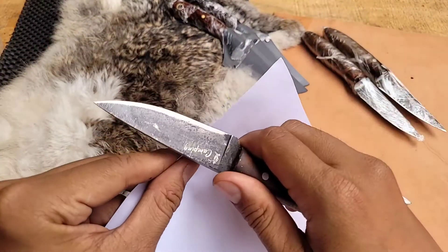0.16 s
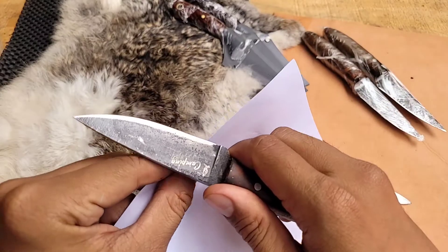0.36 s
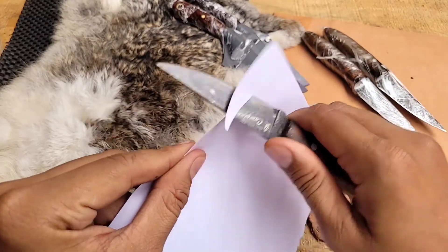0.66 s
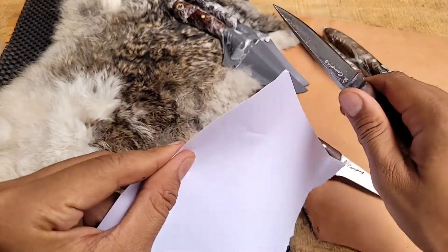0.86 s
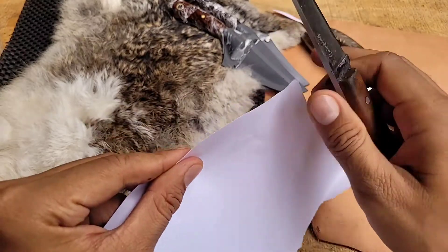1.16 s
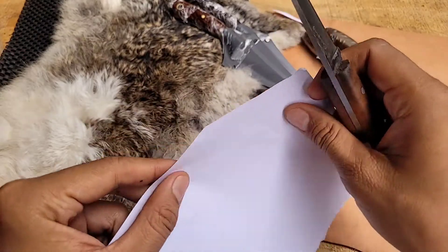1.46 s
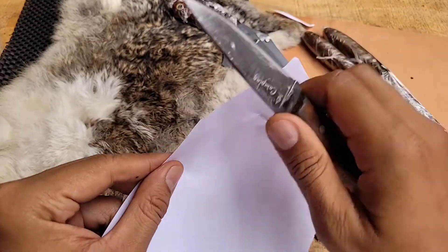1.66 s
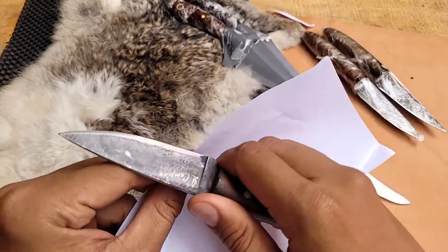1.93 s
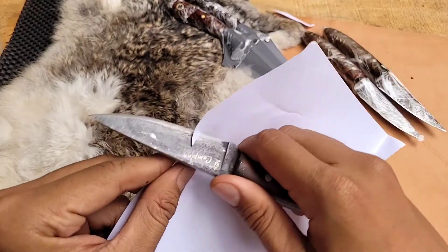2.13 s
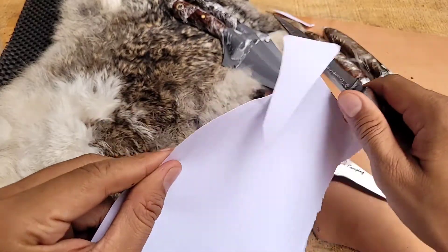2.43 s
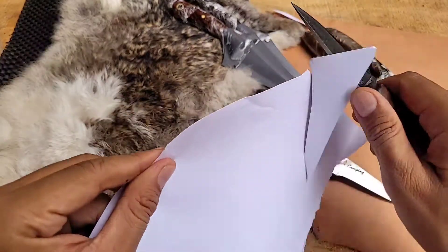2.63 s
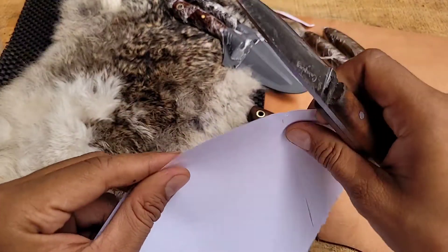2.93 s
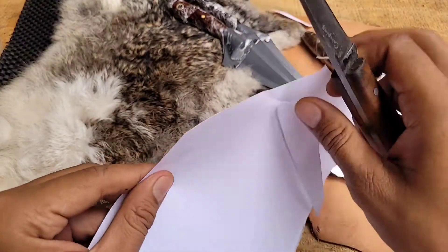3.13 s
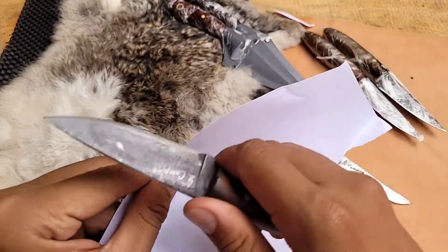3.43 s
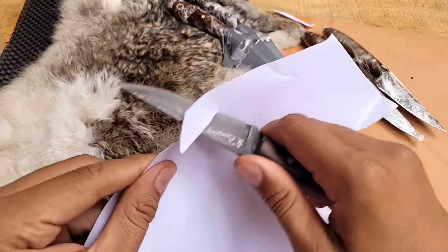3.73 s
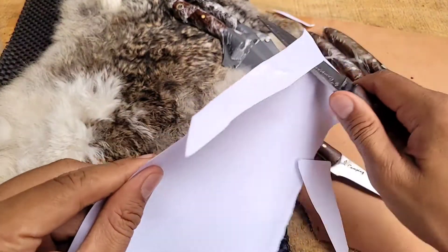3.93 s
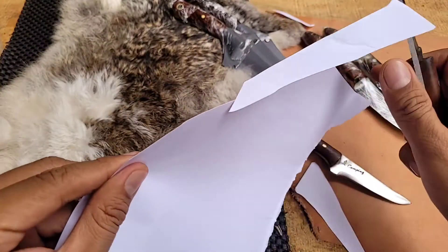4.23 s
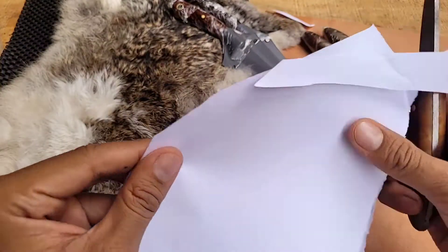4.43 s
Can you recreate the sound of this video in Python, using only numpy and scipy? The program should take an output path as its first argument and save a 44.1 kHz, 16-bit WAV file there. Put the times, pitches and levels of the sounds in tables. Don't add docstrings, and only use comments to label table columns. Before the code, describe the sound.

Three short, crisp knife cuts through paper close up, separated by soft finger rubs and crease snaps, over a faint far-off chugging engine.

```python
import sys
import numpy as np
from scipy import signal
from scipy.fft import rfft, irfft, next_fast_len
from scipy.io import wavfile
from scipy.ndimage import uniform_filter1d, map_coordinates

SR = 44100
rng = np.random.default_rng(int(sys.argv[2]) if len(sys.argv) > 2 else 0)


def nominal_scale(level):
    x = np.asarray(level, float) / 20
    return 10 ** x


def materialize(psi):
    bounded = np.clip(np.atleast_2d(psi).T, -1, 1)
    quanta = np.round(bounded * 32767).astype(np.int16)
    wavfile.write(sys.argv[1], SR, quanta)


N = 201960

# frequency in Hz, level in dB per Hz.
HUSH_COLOUR = [(410, -24), (700, 2.5), (1050, -10.5), (1220, -8), (1340, -16.5), (1470, -9), (2060, -12),
               (2640, -20), (2970, -17), (3420, -25.5), (5260, -20), (5840, -22.5), (15700, -52)]
# time in seconds, engine cycles per second.
IDLE_SPEED = [(0, 11.83), (1.2, 11.86), (2.8, 11.77), (3.5, 11.79), (4.58, 11.8)]
# multiple of the cycle rate, level in dB.
ENGINE_OVERTONES = [(1, -17), (2, -17), (3, -14), (4, 3.5), (5, -10), (6, 2), (7, -14.5), (8, -10.5),
                    (9, -3.5), (10, -9), (11, -2.5), (12, -11.5), (13, 2), (14, -22), (15, 2), (16, 1.5),
                    (17, -10.5), (18, 5), (19, -3), (20, -12.5), (21, -3.5), (22, -7.5), (23, -2.5),
                    (24, -14.5), (25, 4.5), (26, -4), (27, -3), (28, -0.5), (29, -11.5), (30, -9.5),
                    (31, -9), (32, -5.5), (33, -13.5), (34, -15.5), (35, -10.5), (36, -8)]
# frequency in Hz, level in dB per Hz.
EXHAUST_COLOUR = [(15, -37), (25, -11.5), (54, -7), (123, -7.5), (140, -4.5), (301, -2), (340, -3),
                  (355, -21), (533, -8), (677, -21.5), (708, -29.5), (900, -39), (1170, -44), (1980, -120)]
# frequency in Hz, likeness from 0 to 1.
FAR_ALIKE = [(60, 0.82), (130, 1), (290, .83), (640, 0.31), (1400, .02)]
# frequency in Hz, likeness from 0 to 1.
NEAR_ALIKE = [(300, 0.99), (1000, 0.83), (3000, 0.51), (8000, 0.5), (15000, 0.9)]
# frequency in Hz, phase in radians.
NEAR_DRIFT = [(400, .1), (1000, 0.46), (3000, 1.24), (8000, 2.14)]
# frequency in Hz, t60 in seconds.
YARD_T60 = [(200, 0.21), (2000, 0.38), (12000, 0.04)]
# frequency in Hz, left minus right in dB.
PORT_COLOUR = [(110, -0.5), (700, -0.3), (2400, 0.9), (5000, -1.8), (9000, 0.1), (15000, 2.5)]
# time in seconds, peak in dB, pitch in Hz, length in cycles.
AIR_PUFFS = [(0.167, -54, 1580, 4), (.208, -52, 1000, 2.5), (.226, -54, 1430, 4.6), (1.99, -51, 1150, 4),
             (.775, -32, 850, 3.4), (.794, -24.5, 910, 2.2), (.814, -21, 890, 1.2), (.821, -18, 790, 1.4),
             (.826, -15.5, 790, 0.69), (.837, -20, 793, 2.1), (.847, -24.5, 800, 2.2),
             (0.819, -43, 186, 2.9), (1.555, -30.5, 505, 1.9), (2.37, -43, 63.7, 3),
             (2.46, -32.5, 149, 1.6), (3.181, -31, 318, 1.5), (3.9, -51, 398, 3.2), (3.951, -42, 200, 2.5),
             (4.04, -41.5, 111, 0.83), (4.049, -35.5, 432, 5), (4.55, -30.5, 306, 2.35),
             (4.565, -31.5, 132, 0.94)]
# time in seconds, peak in dB, ring in Hz, bright crack in dB over the peak, t60 in seconds.
CREASE_SNAPS = [(1.384, -46.5, 937, -15, 0.025), (1.438, -48, 926, 0, 0.028),
                (1.457, -45.5, 1550, 3, 0.025), (1.55, -26, 925, -27, 0.016), (1.598, -39, 875, -22, 0.036),
                (2.471, -16, 891, -7.5, 0.0083), (2.517, -29, 686, -22, 0.035),
                (2.712, -37, 886, -19.5, 0.027), (2.731, -42, 870, -16, 0.023),
                (2.968, -46.5, 1510, -6.5, 0.018), (3.0, -28.5, 1100, -27, 0.016),
                (3.009, -35, 1380, -12, 0.015), (3.03, -31, 1350, -22, 0.017),
                (3.175, -28.5, 745, -26.5, 0.033), (3.186, -35, 1080, -20.5, 0.042),
                (3.197, -34.5, 840, -20, 0.015), (3.286, -46, 703, -13, 0.027),
                (4.047, -26, 940, -14, 0.04), (4.155, -51, 850, -16, 0.025), (4.426, -43, 775, -14, 0.029),
                (4.525, -34, 700, -20, 0.035), (4.553, -30, 850, -13, 0.054)]
# time in seconds, peak in dB, centre in Hz.
EDGE_TICKS = [(0.8729, -24.5, 4500), (0.9991, -49.5, 7400), (1.3114, -55, 4740), (1.3353, -53, 5240),
              (1.3603, -57, 4220), (2.0224, -52.5, 4300), (2.5084, -29, 12200), (2.6193, -52, 10700),
              (2.6477, -43, 5260), (2.673, -54, 4380), (2.7063, -45, 4290), (2.747, -49, 10900),
              (2.773, -50, 4630), (2.959, -37.5, 4230), (3.2455, -50.5, 4400), (3.3248, -51.5, 4110),
              (4.0686, -29, 5800), (4.0864, -34, 4870), (4.1147, -51, 4900), (4.3326, -60, 4540),
              (4.3535, -46, 7410)]
# lower edge in Hz, upper edge in Hz.
PAPER_BANDS = [(560, 1300), (1300, 4000), (4000, 8000), (8000, 17000)]
# frequency in Hz, level in dB per Hz.
SHEET_COLOUR = [(260, -13), (450, -2.5), (615, 1), (879, -0.5), (1720, -5), (2150, -9.5), (2460, -5),
                (3160, -6.5), (4730, -7), (7620, -11.5), (8840, -14), (12100, -10), (15800, -13.5)]
# time in seconds, force as sheet buzz in dB, bite as edge
# brightness in dB.
CUTS = [
    [(0.585, -75, -14), (0.63, -48, 0), (0.655, -41, -1), (0.728, -36, 5), (0.79, -33, 3), (0.822, -32, 3),
     (0.848, -35.5, 0), (0.9, -56, 2), (1.04, -84, -2)],
    [(2.13, -76, -14), (2.18, -42, 1), (2.275, -31, 0), (2.34, -32, 6), (2.375, -31.5, -2), (2.455, -34, 7),
     (2.478, -35, -3), (2.55, -55, 0), (2.62, -71, -1)],
    [(3.665, -74, -9), (3.7, -46, -1), (3.78, -34, 2), (3.8, -34, 8), (3.83, -32.5, 2), (3.945, -29, -1),
     (4.03, -37, 5), (4.1, -57, 1), (4.27, -78, -2)],
]
# time in seconds, extra flap in dB, width of the whip in
# seconds, strip ring in Hz, flap over the buzz before it in dB.
STRIP_EXITS = [
    (0.826, 9, .05, 800, -10),
    (2.44, 13, .05, 780, -11),
    (4.04, 15, .04, 850, -16),
]
# peak time in seconds, buzz in dB, rise in seconds per 20 dB,
# fall in seconds per 20 dB, brightness in dB.
FINGER_RUBS = [(0.22, -71, .3, .15, -9), (1.365, -58, .03, .18, -3), (1.45, -61, .12, .12, 4),
               (1.525, -64, .12, .1, 6), (1.556, -43, .012, .045, -20), (1.603, -52, .15, .03, -5),
               (1.625, -63, .02, .08, -6), (2.72, -63, .3, .3, -2), (2.99, -56, .12, .05, -4),
               (3.004, -47, .006, .035, -12), (3.03, -57, .06, .15, 3), (3.12, -63, .2, .2, 5),
               (3.158, -50.5, .07, .2, -2), (3.182, -41, .02, .04, -14), (3.22, -64, .02, .12, -5),
               (3.288, -59, .01, .1, -7), (3.34, -66, .1, .15, -4), (4.36, -72, .1, .2, 4),
               (4.41, -66, .06, .15, -12), (4.548, -44, .09, .1, -2), (4.565, -45, .03, .1, -14)]

HUSH_DB, IDLE_DB, SELF_NOISE_DB = -64, -45, -87
TOP_HZ = 15830
SHEET_HZ, SHEET_HZ_PER_DB, SLACK_HZ = 2600, 20, 1650
SCRAPE_DB, HISS_DB, FULL_DB = [-2.7, -4, -2], -1, -31
HISS_GROWS = 1.2
FLAP_LAGS, HISS_LEADS = .65, .12
STRIP_SAG, STRIP_SAG_S = .15, .15
RUB_FLAP_DB, CRUMPLE_FLAPS, RUB_HISS_DB, RUB_RING_HZ = -1, .7, -1, 780


def unit(x):
    return x / np.sqrt(np.mean(x ** 2) + 1e-20)


def along(points, hz):
    f, v = np.transpose(points)
    return np.interp(np.log(hz + 1), np.log(f + 1), v)


def curves(rows):
    s, *cols = np.transpose(rows)
    return [np.interp(np.arange(N) / SR, s, c) for c in cols]


def wobble(rate):
    at = np.arange(0, N + 8, 8)
    knots = rng.standard_normal(int(N * rate / SR) + 4)
    return np.interp(np.arange(N), at, map_coordinates(knots, [at * rate / SR]))


def filtered(x, response):
    m = next_fast_len(N + SR // 2)
    return irfft(rfft(x, m) * response(np.fft.rfftfreq(m, 1 / SR)), m)[..., :N]


def resonant(hz, width_hz, length):
    pole = np.exp(-np.pi * width_hz / SR)
    ring = [1, -2 * pole * np.cos(2 * np.pi * hz / SR), pole ** 2]
    return unit(signal.lfilter([1, 0, -1], ring, rng.standard_normal((2, length))))


def spectrogram(x):
    return signal.stft(x, SR, nperseg=256)


def resynth(z):
    return signal.istft(z, SR, nperseg=256)[1]


def field(shape, bins, frames):
    patches = rng.standard_normal(shape)
    for size, axis in [(bins, 0), (bins, 0), (frames, 1), (frames, 1)]:
        patches = uniform_filter1d(patches, size, axis=axis)
    return unit(patches)


def spread(a, b, alike):
    def shares(hz):
        turn = np.arccos(np.clip(along(alike, hz), -1, 1)) / 2
        return np.array([np.cos(turn), np.sin(turn)])
    mid, side = filtered(np.array([a, b]), shares)
    return np.array([mid + side, mid - side])


def hush():
    hz, t, z = spectrogram(rng.standard_normal((2, N)))
    air = resynth(z * nominal_scale(2.0 * field(z.shape[1:], 3, 14)))[:, :N]
    coloured = filtered(air, lambda f: nominal_scale(along(HUSH_COLOUR, f)))
    return nominal_scale(HUSH_DB + 3.5 + 1.1 * wobble(1.8)) * unit(coloured)


def engine():
    turns = np.cumsum(curves(IDLE_SPEED)[0]) / SR - .78
    scatter = rng.standard_normal((len(ENGINE_OVERTONES), 2)) * [.16, 1]
    beat = np.zeros((2, N))
    for (k, db), off in zip(ENGINE_OVERTONES, scatter):
        firings = np.angle(1 + .8 * np.exp(-2j * np.pi * k * .397)) / (2 * np.pi)
        level = nominal_scale(db + 2.2 * wobble(4))
        phase = k * turns + firings + off[:, None] + .05 * wobble(4)
        beat += level * np.cos(2 * np.pi * phase)
    puffing = rng.standard_normal((2, N)) * nominal_scale(2.1 * wobble(30))
    roar = filtered(puffing, lambda hz: nominal_scale(along(EXHAUST_COLOUR, hz)))
    far = spread(*(0.65 * unit(beat) + 0.77 * unit(roar)), FAR_ALIKE)
    return nominal_scale(IDLE_DB + .3 * wobble(6.66)) * unit(far)


def yard_tail(scale):
    hz, t, z = spectrogram(rng.standard_normal((2, SR // 3)))
    out = resynth(z * nominal_scale(-60 * t / (scale * along(YARD_T60, hz)[:, None])))
    return out / np.linalg.norm(out, axis=1, keepdims=True)


def air_puffs():
    out = np.zeros(N + SR)
    t = np.arange(-SR // 8, SR // 8) / SR
    for s, db, hz, cycles in AIR_PUFFS:
        swell = np.exp(-(hz * t / cycles) ** 2)
        out[round(s * SR):][:len(t)] += nominal_scale(db) * swell * np.sin(2 * np.pi * hz * t)
    return [[1], [.2]] * out[SR // 8:][:N]


def snaps_and_ticks():
    out = np.zeros((2, N + SR))
    t = np.arange(SR // 8) / SR
    for s, db, hz, crack_db, t60 in CREASE_SNAPS:
        pop = [[1], [.3]] * np.sin(2 * np.pi * hz * t) * nominal_scale(-60 * t / (0.67 * t60))
        ragged = 0.483 * resonant(hz, 1.2 * hz, len(t)) * nominal_scale(-60 * t / t60)
        rise = 1 - np.exp(-(t * hz / .45) ** 2)
        crack = resonant(6000, 9000, len(t)) * nominal_scale(crack_db - 3 - 60 * t / .007)
        out[:, round(s * SR):][:, :len(t)] += nominal_scale(db + 3.5) * (rise * (pop + ragged) + crack)
    for s, db, hz in EDGE_TICKS:
        tick = resonant(hz, .5 * hz, len(t)) * nominal_scale(-60 * t / .008)
        out[:, round(s * SR):][:, :len(t)] += nominal_scale(db - 1.0) * tick
    return out[:, :N]


def contact():
    t = np.arange(0, N / SR + .001, .001)
    power = np.full((4, len(t)), 1e-12)
    buzz_hz, flap_hz = SLACK_HZ + 0 * t, RUB_RING_HZ + 0 * t
    for cut, scrape_db, leaving in zip(CUTS, SCRAPE_DB, STRIP_EXITS):
        exit_s, whip_db, width_s, ring_hz, flap_db = leaving
        s, force_db, bite_db = np.transpose(cut)
        on = (t > s[0]) & (t < s[-1])
        force_db, bite_db = np.interp(t, s, force_db), np.interp(t, s, bite_db)
        whip = whip_db * np.exp(-((t - exit_s) / width_s) ** 2)
        loose_db = FLAP_LAGS * np.minimum(FULL_DB - force_db, 20) + whip
        hiss_db = HISS_DB + HISS_GROWS * bite_db + HISS_LEADS * (force_db - FULL_DB)
        parts_db = np.array([flap_db + loose_db, 0 * t, scrape_db + bite_db, hiss_db])
        power += on * nominal_scale(2 * (force_db + parts_db))
        buzz_hz[on] = (SHEET_HZ + SHEET_HZ_PER_DB * (force_db - FULL_DB))[on]
        shortness = np.clip((exit_s - t) / STRIP_SAG_S, 0, 1)
        flap_hz[on] = (ring_hz * (1 + STRIP_SAG * shortness))[on]
    for s, db, rise_s, fall_s, bright_db in FINGER_RUBS:
        touch_db = db - 20 * np.maximum((s - t) / rise_s, (t - s) / fall_s)
        flap_db = RUB_FLAP_DB - CRUMPLE_FLAPS * bright_db
        parts_db = [[flap_db], [0], [bright_db], [RUB_HISS_DB + bright_db]]
        power += nominal_scale(2 * (touch_db + parts_db))
    return curves(np.vstack([t, 10 * np.log10(power), buzz_hz, flap_hz]).T)


def tearing(buzz_db, buzz_hz, flap_hz):
    sparse = np.clip((-42 - buzz_db) / 15, 0, 1)
    clumps = nominal_scale((1.2 + 1.9 * sparse) * wobble(1100) + .8 * wobble(350))
    clumps /= np.sqrt(uniform_filter1d(clumps ** 2, size=3000))
    hz, t, z = spectrogram(clumps * rng.standard_normal((2, N)))
    at = np.minimum((t * SR).astype(int), N - 1)
    pitch = hz[:, None] + 1
    sheet_ring_db = 5 * np.exp(-np.log(pitch / buzz_hz[at]) ** 2 / 0.14)
    strip_ring_db = 7 * np.exp(-np.log(pitch / flap_hz[at]) ** 2 / 0.027)
    patches_db = 1.7 * field(z.shape[1:], bins=5, frames=8) + 2.5 * field(z.shape[1:], bins=1, frames=7)
    gain_db = sheet_ring_db + strip_ring_db + (1 - 0.16 * sparse[at]) * patches_db
    return resynth(z * nominal_scale(gain_db))[:, :N]


def strokes():
    flap_db, buzz_db, scrape_db, hiss_db, buzz_hz, flap_hz = contact()
    tear = tearing(buzz_db, buzz_hz, flap_hz)
    flutter = 2.5 * wobble(90) - 4.5
    out = np.zeros((2, N))
    for (lo, hi), db in zip(PAPER_BANDS, [flap_db + flutter, buzz_db, scrape_db, hiss_db]):
        def band(f):
            return nominal_scale(along(SHEET_COLOUR, f)) / np.sqrt((1 + (lo / (f + 1)) ** 12) * (1 + (f / hi) ** 12))
        out += nominal_scale(db) * unit(filtered(tear, band))

    def sway(f):
        return 1 / np.sqrt((1 + (150 / (f + 1)) ** 4) * (1 + (f / 450) ** 8))
    return out + nominal_scale(buzz_db - 13) * unit(filtered(tear, sway))


def near(pair):
    hz, t, z = spectrogram(spread(*pair, NEAR_ALIKE))
    steady = 2 * np.pi * hz[:, None] * 9e-5
    lead = steady + along(NEAR_DRIFT, hz)[:, None] * field(z.shape[1:], 5, 12)
    return resynth(z * np.exp(.5j * np.array([lead, -lead])))[:, :N]


def scene():
    paper = near(strokes() + snaps_and_ticks() + air_puffs())
    delayed = np.pad(paper, ((0, 0), (300, 0)))
    answer = signal.fftconvolve(delayed, yard_tail(0.51), axes=1)[:, :N]
    return paper + nominal_scale(-19) * answer + engine() + hush()


def top_cut(x):
    return signal.sosfilt(signal.butter(12, 15840, fs=SR, output="sos"), x)


def record(dry):
    def port_response(hz):
        edge = np.clip((TOP_HZ - hz) / 60, 0, 1)
        return nominal_scale(np.array([[.5], [-.5]]) * along(PORT_COLOUR, hz)) * edge
    hissing = dry + nominal_scale(SELF_NOISE_DB) * rng.standard_normal(dry.shape)
    return top_cut(filtered(hissing, port_response))


dry = scene()
out = record(dry)
materialize(out)
```